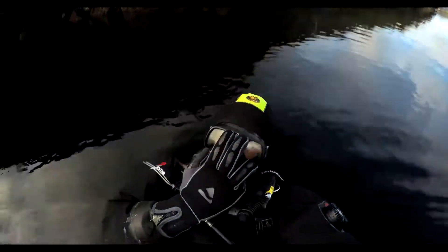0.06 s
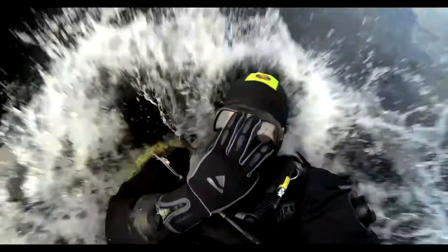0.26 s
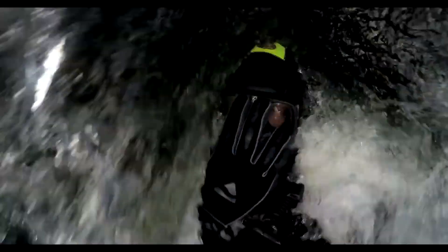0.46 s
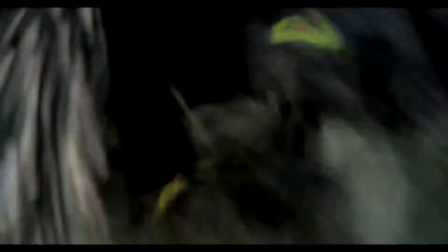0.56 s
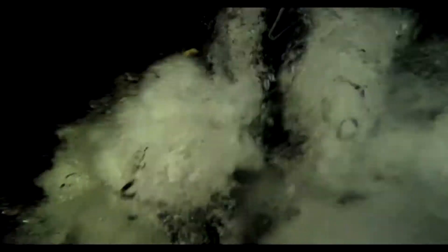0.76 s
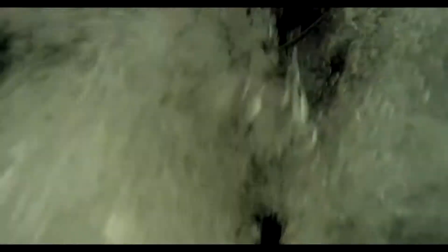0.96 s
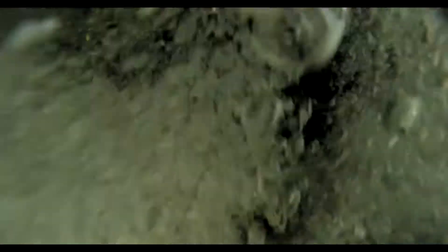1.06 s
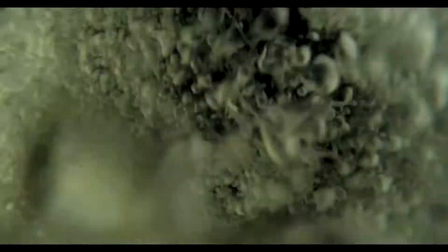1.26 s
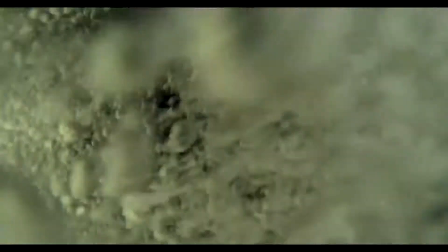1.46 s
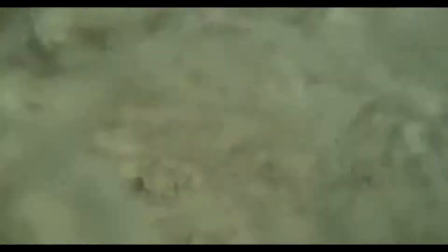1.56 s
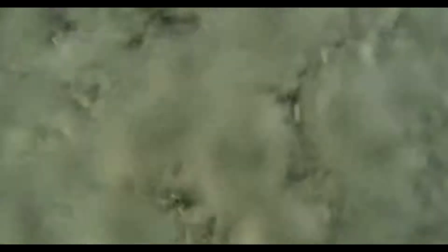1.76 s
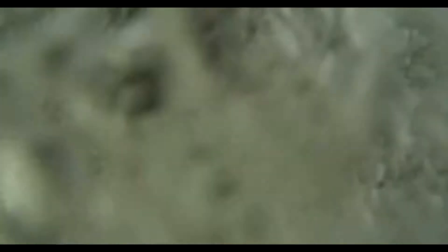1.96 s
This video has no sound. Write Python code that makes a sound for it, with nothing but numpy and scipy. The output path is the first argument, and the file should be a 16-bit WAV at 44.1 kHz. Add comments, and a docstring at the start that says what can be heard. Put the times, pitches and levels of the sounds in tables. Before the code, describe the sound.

A diver rolls into open water: low wind buffeting and growing spray hiss, then a hard, clipping plunge thump with wet slaps, followed by muffled bubble pops, ticks and a low gurgle, all close in a waterproof case.

```python
"""Air buffets a waterproof camera case worn by a diver rolling off a boat, and spray hisses ever closer.
The case plunges in with an overloading thump and water slaps shut over it.
Under water the hiss dies, bubbles pop and tick against the case, and a low gurgle wells up.
Air, spray and swirling water are shaped noise; slaps, pops and gurgle are dying sines, one per bubble.
The thump is a single decaying low sine."""
import sys
import numpy as np
from scipy import signal
from scipy.fft import rfft, irfft
from scipy.io import wavfile
from scipy.ndimage import uniform_filter1d

SR = 44100
rng = np.random.default_rng(int(sys.argv[2]) if len(sys.argv) > 2 else 0)


def wav_record(signal):
    """Record a signal, one row per channel, as 16-bit PCM in the file named by sys.argv[1]."""
    frames = np.transpose(np.atleast_2d(signal))
    bounded = np.clip(frames, -1, 1)
    # unit amplitude maps onto the largest positive 16-bit level
    quanta = np.round(bounded * 32767).astype(np.int16)
    wavfile.write(sys.argv[1], SR, quanta)


N = 88200
TIME = np.arange(N) / SR
DECAY_60_DB = np.log(1000)


def from_db(db):
    """Decibels to gain."""
    return 10 ** (np.asarray(db) / 20)


def curve_at_time(curve):
    """Interpolate (time_s, value) rows at every sample."""
    return np.interp(TIME, *np.transpose(curve))


def even(x, span_s):
    """Hold the rms near one over the given span, keeping faster detail."""
    power = uniform_filter1d(x ** 2, max(int(span_s * SR), 8))
    floor = 0.0012 * np.mean(x ** 2)
    return x / np.sqrt(np.abs(power) + floor)


def coloured(x, colour, resonances=()):
    """Filter by a (frequency_hz, density_db) outline plus (centre_hz, width_hz, lift_db) bumps."""
    hz = np.arange(N // 2 + 1) * SR / N + 1e-3  # offset avoids log(0)
    points_hz, points_db = np.transpose(colour)
    gain_db = np.interp(np.log(hz), np.log(points_hz), points_db)
    for centre_hz, width_hz, lift_db in resonances:
        gain_db = gain_db + lift_db / (1 + (2 * (hz - centre_hz) / width_hz) ** 2)
    return irfft(rfft(x) * from_db(gain_db), N)


def add(out, start_s, sound):
    """Mix a sound in at a time."""
    i = int(np.clip(start_s * SR, 0, N))
    out[i:i + len(sound)] += sound[:N - i]


def turbulence(level_curve, colour, span_s):
    """Lumpy pressure of a fluid flowing past the case: coloured noise under a level curve."""
    noise = coloured(rng.standard_normal(N), colour)
    return from_db(curve_at_time(level_curve)) * even(noise, span_s)


def bubble(hz, cycles, softness=1, rise=0.02):
    """Sine with a rounded start, 60 dB down after `cycles`, its pitch up by the share `rise` by then."""
    onset_cycles, onset_s = .55, .0003  # start-up time is the sum of both
    length_s = 2 * cycles / hz + 2 * onset_s
    turn = np.arange(int(length_s * SR) + 2) * hz / SR
    onset = softness * (onset_cycles + onset_s * hz)
    attack = 1 - np.exp(-(turn / onset) ** 2)
    envelope = attack * np.exp(-DECAY_60_DB * turn / cycles)
    phase_turns = turn * (1 + rise * turn / cycles / 2)
    return envelope / envelope.max() * np.sin(2 * np.pi * phase_turns)


def cloud(level_curve, low_hz, high_hz, per_s, cycles, spread_db, clump_db, tilt_db_per_octave, span_s):
    """Bubbles of random pitch, loudness and moment, in bunches; the tilt is fixed or changes over time."""
    clumps_per_s = 45
    out = np.zeros(N)
    bunches = rng.standard_normal(1000)
    tilt = np.broadcast_to(tilt_db_per_octave, N)
    for when, pitch, size, ring, sign in rng.random((int(per_s * N / SR), 5)):
        start_s = when * N / SR
        hz = low_hz * (high_hz / low_hz) ** pitch
        bunch = np.interp(start_s * clumps_per_s, np.arange(len(bunches)), bunches)
        size_db = spread_db * min(-np.log(1 - size), 3)
        tilt_db = tilt[int(when * N)] * np.log2(hz / low_hz)
        gain = from_db(size_db + clump_db * bunch + tilt_db)
        add(out, start_s, np.sign(sign - .5) * gain * bubble(hz, cycles * (.5 + ring)))
    return from_db(curve_at_time(level_curve)) * even(out, span_s)


def scattered(x, wet_db):
    """Sound bouncing about in the bubble cloud and the case: dry plus a brief decaying-noise tail."""
    t60_s = 0.036
    t = TIME[:SR // 20]
    tail = rng.standard_normal(len(t)) * np.exp(-DECAY_60_DB * t / t60_s)
    tail /= np.linalg.norm(tail)
    return x + from_db(wet_db) * signal.fftconvolve(x, tail)[:N]


def wind():
    """Air, then water, buffets the case as mostly low-frequency turbulence."""
    # rms level: time_s, level_db
    wind_level = [(0, -30.5), (.14, -35.5), (.27, -20.5), (.35, -28.5), (.39, -26), (.45, -25.5),
                  (.55, -30), (.61, -21.5), (.66, -25), (.71, -44.5), (.76, -36), (1.12, -42.5),
                  (1.2, -48.5), (1.4, -61.5)]
    # spectrum: frequency_hz, density_db (relative, per Hz)
    wind_colour = [(10, -4.5), (20, 0.5), (36, -3), (55, -7.5), (90, -26), (135, -27), (270, -37.5),
                   (500, -47), (1000, -93.5)]
    return turbulence(wind_level, wind_colour, span_s=0.062)


def spray(grain_db=2.5, surge_db=1.42, surges_per_s=90):
    """Countless drops, arriving in small surges, merge into a hiss that rings in the case."""
    # rms level: time_s, level_db
    spray_level = [(0, -54.5), (.07, -49.5), (.16, -47.5), (.25, -38.5), (.31, -39.5), (.38, -42.5),
                   (.425, -37.5), (.545, -35), (.582, -28), (.61, -28.5), (.655, -21.5), (.671, -27),
                   (.685, -22), (.698, -31), (.715, -42), (.76, -38), (.8, -42.5), (.857, -42), (.875, -53),
                   (.93, -56), (1.15, -120)]
    # spectrum: frequency_hz, density_db (relative, per Hz)
    spray_colour = [(100, -36), (250, -14.5), (500, -5.5), (850, -8), (1500, -6.5), (2500, -3),
                    (3300, -5.5), (5800, -14.5), (9000, -17.5), (15000, -27)]
    # case resonances: centre_hz, width_hz, lift_db
    case_modes = [(1130, 240, 8), (1786, 910, 5.5), (2784, 490, 4.5), (4680, 1100, 12.5), (7130, 1300, 7)]
    drops = rng.standard_normal(N) * from_db(grain_db * rng.standard_normal(N))
    surges = np.interp(TIME * surges_per_s, np.arange(N), rng.standard_normal(N))
    hiss = coloured(drops * from_db(surge_db * surges), spray_colour, case_modes)
    return from_db(curve_at_time(spray_level)) * even(hiss, 0.15)


def whump():
    """The body hits the water with a dull whump of low-frequency noise."""
    # rms level: time_s, level_db
    whump_level = [(0, -48), (.13, -48), (.21, -39.5), (.3, -44.5), (.35, -66), (.6, -54), (.7, -85)]
    # spectrum: frequency_hz, density_db (relative, per Hz)
    whump_colour = [(50, -27), (125, 1), (210, -7), (320, -15.5), (700, -21.5), (2000, -54.5)]
    return turbulence(whump_level, whump_colour, span_s=0.1)


def slaps(cycles=10.8, scatter_s=0.0032, scatter_octaves=.65, shed_ratio=1.222, small_db=-11, count=9):
    """Each slap traps a main bubble and sheds weaker ones, mostly higher, just after it."""
    # water slapping the case: start_s, centre_hz, main_bubble_peak_db
    slap_events = [(0.0544, 1480, -34.5), (0.253, 2320, -28), (0.652, 1560, -10), (0.6448, 3400, -8),
                   (0.6576, 960, -9), (.679, 2030, -5), (0.6826, 1350, -3.5), (.6845, 2330, -8),
                   (.685, 3940, -12.5), (0.723, 1430, -15), (0.7282, 950, -13), (0.731, 3020, -21.5),
                   (0.7375, 1130, -9.5), (0.7524, 3160, -17.5), (.832, 1140, -20.5), (0.9256, 1380, -25),
                   (0.9452, 1850, -25), (0.996, 1550, -29), (1.024, 1340, -29.5), (1.047, 1490, -31.5),
                   (1.065, 2100, -29.5), (1.126, 3000, -35.5), (1.149, 2960, -41), (1.211, 1980, -40),
                   (1.24, 1300, -43), (1.252, 1700, -33.5), (1.301, 2300, -49), (1.319, 1700, -51),
                   (1.333, 2400, -39), (1.344, 1120, -32), (1.345, 2820, -37.5), (1.407, 1900, -46),
                   (1.564, 1500, -43.5), (1.644, 2310, -41.5), (1.676, 1380, -45), (1.819, 1190, -36.5),
                   (1.905, 2400, -39), (1.9419, 1360, -30.5)]
    out = np.zeros(N)
    for start_s, hz, peak_db in slap_events:
        add(out, start_s, from_db(peak_db) * bubble(hz, cycles, softness=0.57))
        for late, pitch, size in rng.standard_normal((count, 3)):
            shed_hz = min(shed_ratio * hz * 2 ** (scatter_octaves * pitch), SR / 4)
            shed_gain = from_db(peak_db + small_db - 3 * abs(pitch)) * size
            shed = shed_gain * bubble(shed_hz, cycles, softness=.5)
            add(out, start_s + scatter_s * abs(late), shed)
    return out


def pops():
    """Single bubbles ring at the case; tiny ones tick with a sharper onset."""
    # loud single bubbles: start_s, pitch_hz, peak_db, ring_cycles
    pop_events = [(.056, 3420, -27, 43), (.6266, 4770, -12.5, 15), (0.6482, 2410, -4.5, 15.4),
                  (.7445, 774, -12, 14.5), (0.75, 1920, -15, 23), (.7801, 653, -19.5, 14),
                  (0.8807, 1256, -23, 32), (0.9125, 368, -22, 7.9), (0.9836, 1807, -18, 24),
                  (1.1, 88.5, -28, 7.7), (1.126, 645, -44, 9.3), (1.1607, 690, -36, 49),
                  (1.176, 1340, -37.5, 63), (1.222, 211, -32, 20), (1.252, 590, -37, 69),
                  (1.256, 2790, -42, 63), (1.257, 920, -34, 43), (1.289, 606, -40.5, 28),
                  (1.343, 3667, -34.5, 75), (1.349, 794, -36.5, 15.4), (1.564, 3260, -42, 45),
                  (1.5812, 544, -31.5, 6.6), (1.6707, 620, -34.5, 28), (1.7267, 600, -34.5, 24),
                  (1.642, 4380, -40.5, 56), (1.829, 638, -25, 59), (1.8783, 660, -27, 14),
                  (1.8913, 1244, -31, 37), (1.912, 3720, -35.5, 30), (1.9864, 1260, -28, 22)]
    # tiny bubbles: start_s, peak_db, pitch_hz
    tick_events = [(.648, -10, 9630), (0.723, -23.5, 6100), (0.7497, -17.5, 5330), (.86, -32, 5640),
                   (.9465, -32.5, 6760), (0.996, -33, 4300), (1.071, -49.5, 6450), (1.152, -40, 4070),
                   (1.1767, -42.5, 6470), (1.255, -50.5, 5440), (1.283, -48, 6330), (1.343, -43.5, 9000),
                   (1.405, -46.5, 2770), (1.499, -55.5, 8700), (1.729, -50, 8400)]
    out = np.zeros(N)
    for start_s, hz, peak_db, cycles in pop_events:
        add(out, start_s, from_db(peak_db) * bubble(hz, cycles, softness=0.62))
    for start_s, peak_db, hz in tick_events:
        add(out, start_s, from_db(peak_db) * bubble(hz, cycles=30, softness=.25))
    return out


def swirl():
    """Water swirls round the case as low turbulence."""
    # rms level: time_s, level_db
    swirl_level = [(.55, -73), (.65, -18), (.72, -39), (.76, -32), (.9, -38.5), (1.02, -42.5),
                   (1.12, -44.5), (1.17, -48.5), (1.23, -45), (1.33, -46.5), (1.42, -54.5), (1.53, -44.5),
                   (1.65, -41.5), (1.8, -38), (1.9, -35.5), (2, -33.5)]
    # spectrum: frequency_hz, density_db (relative, per Hz)
    swirl_colour = [(10, -20), (28, -3.5), (70, 2), (130, -1), (190, 0.5), (260, -9), (400, -15.5),
                    (700, -15), (1200, -37.5), (3000, -59), (8000, -74), (16000, -85)]
    return turbulence(swirl_level, swirl_colour, span_s=0.034)


def babble():
    """Small bubbles ring at middle pitches; the higher ones thin out with depth."""
    # rms level before scattering: time_s, level_db
    babble_level = [(.6, -67), (.65, -30), (.71, -29), (.745, -23.5), (.775, -34.5), (.85, -34.5),
                    (.9, -43.5), (.99, -43.5), (1.06, -48.5), (1.11, -56), (1.17, -53.5), (1.22, -61),
                    (1.255, -53), (1.28, -66), (1.35, -51), (1.37, -63), (1.47, -61), (1.6, -63),
                    (1.69, -56.5), (1.79, -54), (1.9, -46), (2, -48)]
    # balance of high against low bubbles: time_s, tilt_db_per_octave
    babble_tilt = [(.72, 1), (1, 2.5), (1.33, -9.5), (1.42, -10), (2, -9.5)]
    return cloud(babble_level, low_hz=932, high_hz=3566, per_s=1100, cycles=19, spread_db=3.5,
                 clump_db=7.5, tilt_db_per_octave=curve_at_time(babble_tilt), span_s=0.051)


def fizz():
    """The finest bubbles ring highest and shortest."""
    # rms level before scattering: time_s, level_db
    fizz_level = [(.6, -77), (.68, -39.5), (.8, -45.5), (.9, -53.5), (1, -61), (1.09, -75), (1.33, -76),
                  (1.39, -91.5), (1.6, -81.5), (1.8, -72.5), (2, -68)]
    return cloud(fizz_level, low_hz=3300, high_hz=14100, per_s=1100, cycles=22, spread_db=8.0,
                 clump_db=8.5, tilt_db_per_octave=-9, span_s=0.06)


def gurgle():
    """Large bubbles ring low and long."""
    # rms level before scattering: time_s, level_db
    gurgle_level = [(.62, -63), (.71, -32), (.77, -44), (.87, -46), (1, -45.5), (1.08, -57.5), (1.22, -61),
                    (1.255, -47), (1.29, -56), (1.345, -50), (1.38, -65), (1.48, -55), (1.6, -47.5),
                    (1.69, -41.5), (1.79, -41.5), (1.87, -37), (2, -42.5)]
    return cloud(gurgle_level, low_hz=287.3, high_hz=835, per_s=700, cycles=33, spread_db=4.0,
                 clump_db=4.5, tilt_db_per_octave=5.5, span_s=0.059)


def plunge(start_s=.6425, hz=56, gain_db=-2, attack_s=0.0022, hold_s=0.013, release_s=0.0051):
    """The air cavity round the case closes: one heavy, quickly damped pressure swing."""
    t = np.maximum(TIME - start_s, 0)
    attack = 1 - np.exp(-t / attack_s)
    release = np.exp(-np.maximum(t - hold_s, 0) / release_s)
    return from_db(gain_db) * attack * release * np.sin(2 * np.pi * hz * t)


def air_pocket(start_s=.92, hz=380, peak_db=-36, cycles=150, rise=.7, softness=32):
    """A large pocket of air swells, rings on and glides upward as it nears the surface."""
    out = np.zeros(N)
    add(out, start_s, from_db(peak_db) * bubble(hz, cycles, softness, rise))
    return out


def scene():
    """Mono mix of fall, plunge and bubbles; single bubbles get a faint tail, clouds a stronger one."""
    fall = wind() + spray()
    water = whump() + swirl()
    contacts = scattered(slaps() + pops(), wet_db=-11.0)
    clouds = scattered(babble() + fizz() + gurgle(), wet_db=-6.5)
    return (fall + water + contacts + clouds + plunge() + air_pocket())[None]


def record(dry):
    """The microphone saturates smoothly on the loudest peaks, then a steep low-pass cuts the top."""
    overload, cutoff_hz = 0.49, 15300  # overload: ceiling as amplitude
    flattened = dry / (1 + (dry / overload) ** 6) ** (1 / 6)
    low_pass = signal.ellip(10, .1, 80, cutoff_hz, fs=SR, output="sos")
    return signal.sosfilt(low_pass, flattened)


dry = scene()
out = record(dry)
wav_record(out)
```